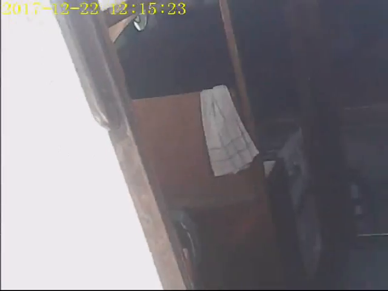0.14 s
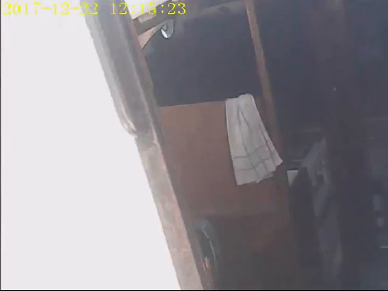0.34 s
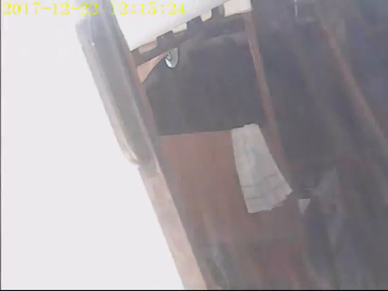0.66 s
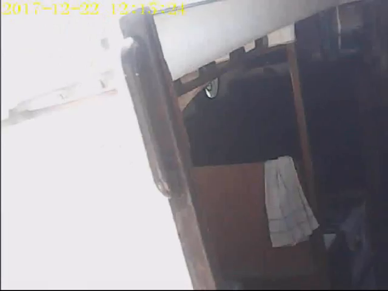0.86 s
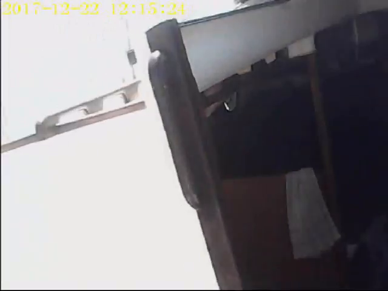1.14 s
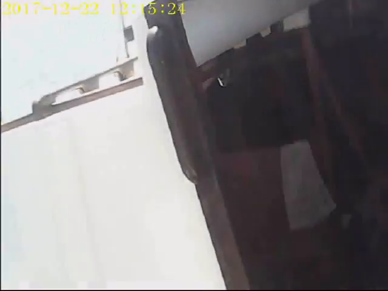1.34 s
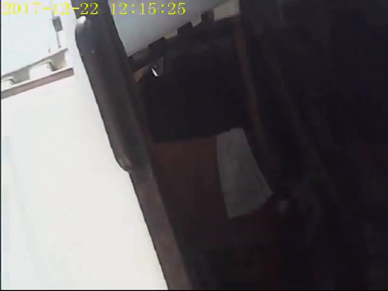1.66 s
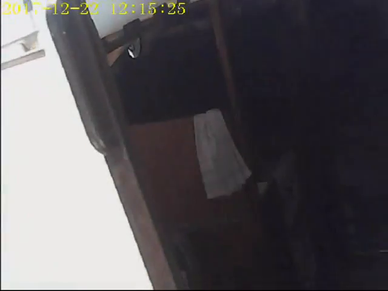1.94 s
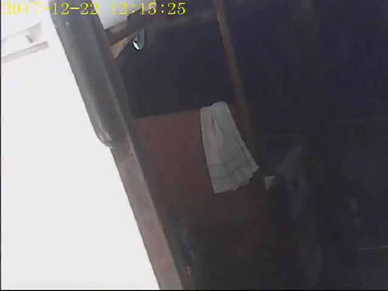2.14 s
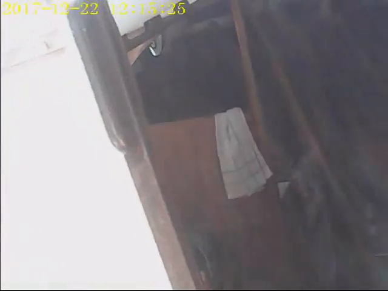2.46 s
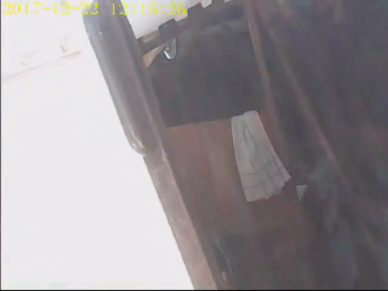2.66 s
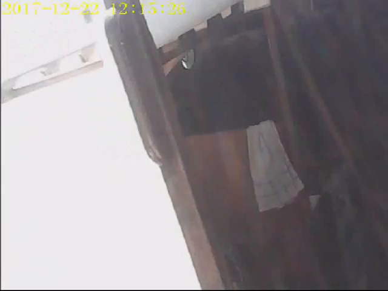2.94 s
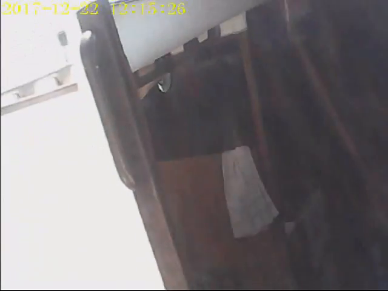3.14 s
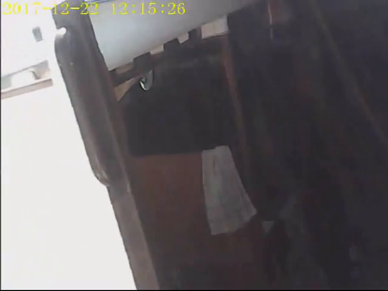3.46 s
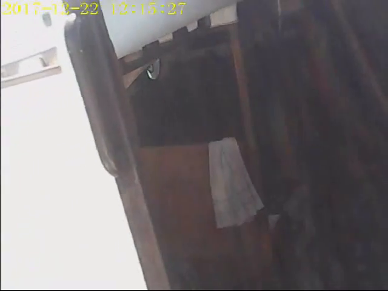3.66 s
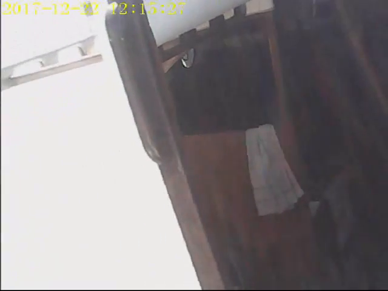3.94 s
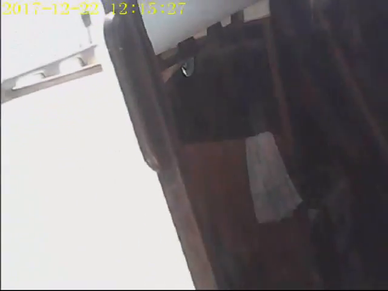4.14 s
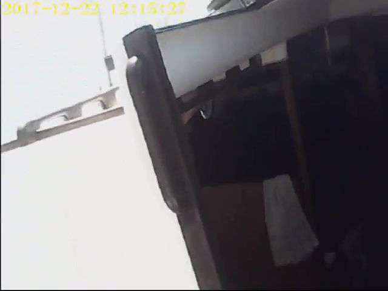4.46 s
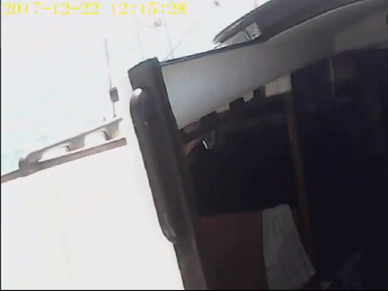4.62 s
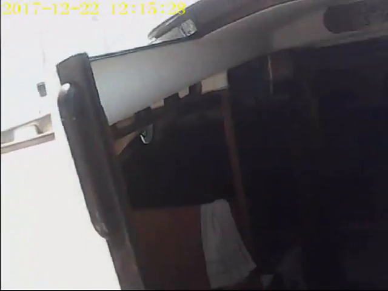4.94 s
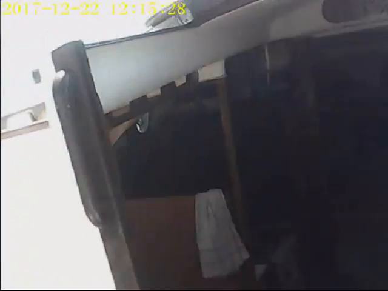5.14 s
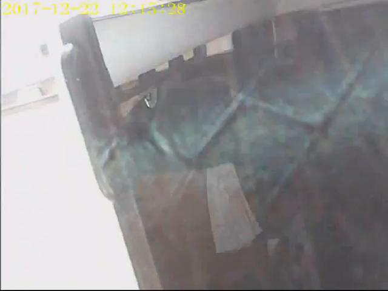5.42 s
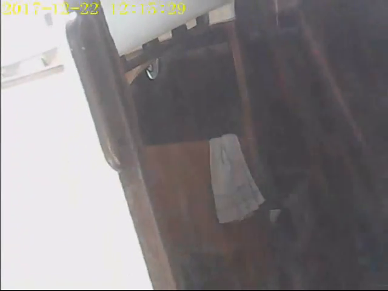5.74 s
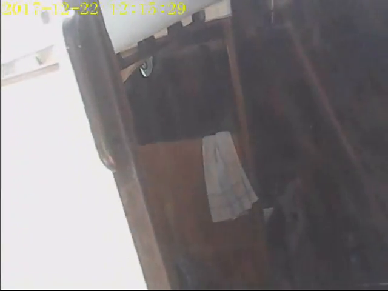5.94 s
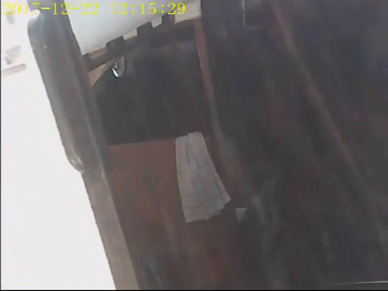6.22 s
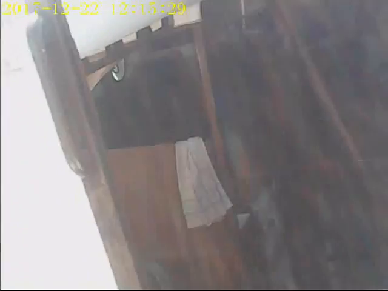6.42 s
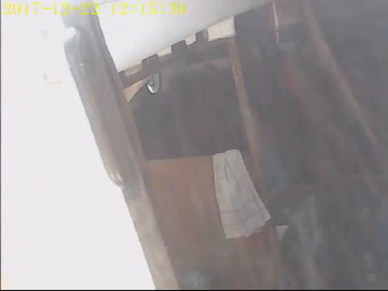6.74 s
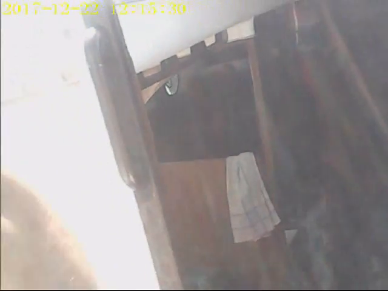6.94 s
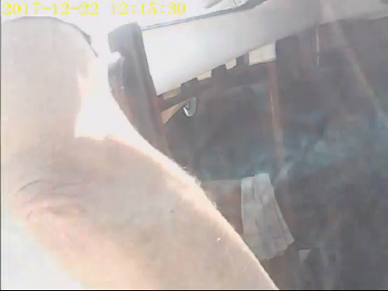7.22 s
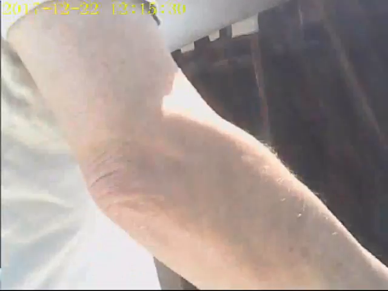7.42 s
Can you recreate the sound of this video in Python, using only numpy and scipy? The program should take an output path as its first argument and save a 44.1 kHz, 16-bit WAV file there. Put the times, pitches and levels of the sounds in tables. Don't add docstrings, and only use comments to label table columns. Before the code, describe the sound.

Aboard a sailing boat, a diesel engine throbs low and steady with a rapid ratchet-like metallic knock about thirteen times a second. Water washes and slaps quietly along the hull, and light wind puffs rumble. One small hard tick comes partway through. Near the end a gust batters the microphone with dull thumps and crackling bursts. The sound is close, cheap and gritty, with a hissy, harsh top.

```python
import sys
import numpy as np
from scipy import signal
from scipy.fft import rfft, irfft, next_fast_len
from scipy.io import wavfile
from scipy.ndimage import uniform_filter1d

SR = 44100
rng = np.random.default_rng(int(sys.argv[2]) if len(sys.argv) > 2 else 0)


def to_wav(sig):
    pcm = np.clip(np.atleast_2d(sig), -1, 1) * 32767
    pcm = np.round(pcm).astype(np.int16)
    wavfile.write(sys.argv[1], SR, pcm.T)


def field_ratio(decibels):
    return 10 ** (np.asarray(decibels, dtype=float) / 20)


N = 334278
TIME_S = np.arange(N) / SR


def evened(x):
    return x / np.sqrt(np.mean(x ** 2) + 1e-20)


def noise(count=N):
    return rng.standard_normal(count)


def filtered(x, order, hz, kind="low"):
    return signal.sosfilt(signal.butter(order, hz, kind, fs=SR, output="sos"), x)


def coloured(x, spectrum):
    size = next_fast_len(len(x))
    hz, db = np.transpose(spectrum)
    log_hz = np.log(np.fft.rfftfreq(size, 1 / SR) + 1)
    gain = field_ratio(np.interp(log_hz, np.log(hz), db))
    return irfft(rfft(x, size) * gain, size)[:len(x)]


def ring(x, modes):
    out = 0
    for hz, width_hz, db in modes:
        peak = signal.iirpeak(hz, hz / width_hz / 1.5, SR)
        out = out + field_ratio(db) * signal.lfilter(*peak, signal.lfilter(*peak, x))
    return out


def wander(hz):
    return evened(filtered(noise(), 2, hz))


# (time [s], firings so far [count])
CRANK = [(0, -.319), (1.2, 15.483), (2, 26.069), (2.8, 36.612), (4.2, 55.112), (6, 78.93), (7.6, 100.05)]
THROB_DB = [-46, -38.5, -41, -44.5, -44.5, -50, -46.5, -39.5, -46.5, -64, -57, -51, -54, -53.5, -57, -54,
            -45, -50.5, -56, -47.5, -60, -68, -60.5, -62, -57]
# (multiple [firing rate], level [dB rms])
WHINE = [(30, -66), (32, -56.5), (33, -53), (35, -68.5), (36, -54.5), (39, -62), (40, -69.5), (41, -60),
         (44, -58.5), (46, -60), (62, -67), (67, -60), (71, -60.5), (72, -62.5)]
SWELL_AT = [(3, .94), (4, 1.28), (5, .92), (8, 1.32), (9, 1.57), (12, 1.3), (20, 1.37), (72, 1.1)]


def throb():
    turns = np.interp(TIME_S, *np.transpose(CRANK))
    sway = wander(3.75)
    multiples = np.arange(73)
    late = np.cumsum(np.interp(multiples, *np.transpose(SWELL_AT)))
    loose = np.minimum(multiples / 40, 1) * rng.uniform(-.5, .5, 73)
    out = np.zeros(N)
    for k, db in list(enumerate(THROB_DB, 1)) + [(round(k), db) for k, db in WHINE]:
        level = field_ratio(db + 1.75 * np.roll(sway, 4000 * k)) * np.sqrt(2)
        out += level * np.cos(2 * np.pi * (k * turns - late[k] + loose[k]))
    return out


def beats(share, spread_db, jitter):
    s, firings = np.transpose(CRANK)
    luck = rng.standard_normal((104, 2))
    cycle = np.arange(-2, 102) + share + jitter * luck[:, 0]
    at = np.interp(cycle, firings, s, -1, 99) * SR
    inside = (at >= 0) & (at < N)
    clicks = np.zeros(N)
    clicks[at[inside].astype(int)] = field_ratio(spread_db * luck[inside, 1])
    return clicks


# (time [share of cycle], into cover [dB], into block [dB], rattle t60 [s])
BLOWS = [
    (.655, -2, -10, .07),
    (.915, -1, 0, .042),
    (.1, -3, -7, .085),
]
# (frequency [Hz], width [Hz], level [dB])
COVER = [(2100, 250, -7), (2378, 28, 3)]
# (frequency [Hz], width [Hz], level [dB])
BLOCK = [(2551, 210, 1), (2688, 80, -3), (2910, 400, -17), (3970, 420, -14), (3960, 150, -19),
         (6400, 92, -21.5)]
# (frequency [Hz], width [Hz], level [dB])
HULL = [(316, 14, 10), (448, 70, 13), (506, 41, 10), (596, 35, 4), (818.5, 55, 8), (954, 43, 6.5),
        (1308, 53, 0.5)]
# (frequency [Hz], level [dB])
CLATTER = [(150, 11), (300, 5), (500, 2.5), (950, 2.5), (1400, -8), (2500, -3), (3400, -15), (4500, -14.5),
           (5000, -34), (8000, -35)]
KNOCK_DB, CLATTER_DB, HULL_DB = -53, 9.0, -47.5


def knock():
    t = np.arange(SR // 5) / SR
    cover, block, envelope = np.zeros((3, N))
    for share, cover_db, block_db, t60_s in BLOWS:
        clicks = beats(share, spread_db=1.4, jitter=.008)
        decay = field_ratio(-60 * t / t60_s) * (1 - np.exp(-t / 0.0039))
        dying = signal.oaconvolve(clicks, decay)[:N]
        blow = dying * noise() + 7 * clicks
        cover += field_ratio(cover_db) * blow
        block += field_ratio(block_db) * blow
        envelope += field_ratio(block_db) * dying
    metal = evened(ring(cover, COVER) + ring(block, BLOCK))
    hull = evened(ring((envelope + 0.067) * noise(), HULL))
    rattle = (uniform_filter1d(envelope, 300) + 0.18) * noise()
    clatter = field_ratio(CLATTER_DB) * evened(coloured(rattle, CLATTER))
    return field_ratio(KNOCK_DB) * (metal + clatter) + field_ratio(HULL_DB) * hull


# (crest time [s], level [dB rms])
PUFFS = [(.57, -33.5), (1.15, -34.5), (1.42, -35.5), (1.72, -35), (2.02, -28), (2.41, -34), (2.98, -37),
         (3.53, -31), (3.85, -43), (4.48, -42), (4.79, -37), (5.33, -31.5), (5.84, -32.5)]
CALM_DB, BUILD_DB_PER_S, DROP_DB_PER_S, PUFF_RUSH_DB = -44, 69, 164, -14.5
# (start [s], hold [s], level [dB rms], rush above 280 Hz re level [dB])
BLASTS = [(6.22, 0.028, -25, -23), (6.32, 0.0068, -22, -14), (6.472, .02, -20.5, -9.5),
          (6.503, 0.053, -19.5, -17.5), (6.585, 0.03, -21, -10.5), (6.668, 0.082, -19, -9),
          (6.779, 0.049, -19, -7.5), (6.904, .08, -22, -10.5), (7.045, 0.041, -26, -5.5),
          (7.128, 0.096, -26, -13), (7.277, 0.036, -19.5, -11), (7.332, 0.096, -26.5, -7),
          (7.47, 0.16, -29.5, -9.5)]
ATTACK_DB_PER_S, RELEASE_DB_PER_S = 700, 308
# (frequency [Hz], level [dB])
WIND = [(8, 4), (30, 0), (150, -3), (400, -8), (700, -18), (1400, -28.5), (3000, -45), (8000, -85)]


def wind():
    pressure = np.full(N, field_ratio(CALM_DB))
    for s, db in PUFFS:
        fall_db = np.maximum(BUILD_DB_PER_S * (s - TIME_S), DROP_DB_PER_S * (TIME_S - s))
        pressure += field_ratio(db - fall_db)
    rushing = field_ratio(PUFF_RUSH_DB) * pressure
    for s, hold_s, db, rush_db in BLASTS:
        before_db = ATTACK_DB_PER_S * (s - TIME_S)
        after_db = RELEASE_DB_PER_S * (TIME_S - s - hold_s)
        blast = field_ratio(db - np.maximum(np.maximum(before_db, after_db), 0))
        pressure += blast
        rushing += field_ratio(rush_db) * blast
    air = coloured(noise(), WIND)
    low = evened(filtered(air, 3, 280))
    rush = evened(filtered(air, 2, 280, "high"))
    crackle = field_ratio(3 * wander(120))
    return pressure * field_ratio(1.03 * wander(42)) * low + rushing * crackle * rush


# (time [s], peak level [dB], length [ms])
POPS = [(1.977, -24, 6), (1.995, -30, 8), (6.228, -29.5, 12), (6.303, -32, 5), (6.467, -8, 4.7),
        (6.492, -19, 8.9), (6.518, -27, 8), (6.579, -25, 12), (6.599, -10, 4.4), (6.659, -35, 6.8),
        (6.685, -16.5, 6.4), (6.711, -22, 8.8), (6.744, -21, 8), (6.945, -22, 9.8), (6.978, -14, 35),
        (7.054, -12, 25), (7.08, -16, 6.5), (7.18, -21, 14), (7.238, -19.5, 8), (7.27, -13.5, 6.7),
        (7.303, -15.5, 16), (7.342, -15, 8.9), (7.397, -16, 18), (7.479, -21, 7), (7.558, -24.5, 5.8)]
# (frequency [Hz], level [dB])
POP = [(200, 17), (500, 2), (1000, 0.5), (1800, -8.5), (3000, -18.5), (5000, -52), (8000, -55)]


def pops():
    out = np.zeros(N + SR)
    t = np.arange(SR // 10) / SR
    for s, db, ms in POPS:
        envelope = np.exp(-t * 1000 / max(ms, 1)) * (1 - np.exp(-t / 0.00091))
        flutter = coloured(noise(len(t)), POP) * envelope
        out[round(s * SR):][:len(t)] += field_ratio(db) * flutter / abs(flutter).max()
    return out[:N]


# (crest time [s], peak level [dB], length [ms], direction [sign])
THUMPS = [(2.034, -17, 1.2, 1), (6.232, -18, 3, 1), (6.328, -11, 1.6, 1), (6.504, -13, 1.4, 1),
          (6.511, -9, 3, -1), (6.552, -7, 2, 1), (6.69, -13, 1.2, 1), (6.748, -13, 1, 1),
          (6.774, -9, 1.4, -1), (6.799, -8, 1.6, -1), (6.918, -13, 1, 1), (6.949, -13, 1, 1),
          (6.98, -12, 1.4, -1), (7.283, -8, 2, 1), (7.345, -11, .8, 1), (7.486, -15, 3, 1)]


def thumps():
    out = np.zeros(N)
    for s, db, ms, direction in THUMPS:
        u = np.arange(-800, 800) / SR * 1000 / ms
        crest = (1 - 0.37 * u ** 2) * np.exp(-u ** 2 / 2)
        out[round(s * SR) - 800:][:1600] += np.sign(direction) * field_ratio(db) * crest
    return out


# (time [s], peak level [dB])
TICKS = [
    (2.2394, -46),
    (3.1005, -28.5),
    (5.572, -42),
    (5.713, -39),
    (5.95, -42),
    (6.22, -40),
    (6.302, -40),
]
# (frequency [Hz], width [Hz], level [dB])
FITTING = [(1050, 150, 7), (1450, 150, 7), (2600, 900, -3), (4050, 400, 3), (4900, 400, 1), (5600, 350, 2)]


def ticks():
    out = np.zeros(N)
    t = np.arange(SR // 20) / SR
    for s, db in TICKS:
        strike = field_ratio(-60 * t / .036) * noise(len(t)) + 10 * (t == 0)
        tick = ring(strike, FITTING)
        out[round(s * SR):][:len(t)] += field_ratio(db) * tick / abs(tick).max()
    return out


def swells(rows, spectrum):
    shape = sum(field_ratio(db) * np.exp(-((TIME_S - s) / length_s) ** 2) for s, db, length_s in rows)
    return shape * field_ratio(4.1 * wander(87)) * evened(coloured(noise(), spectrum))


# (crest time [s], level [dB rms], length [s])
SLAPS = [(.55, -49.5, 0.06), (1.2, -49, 0.055), (1.4, -53.5, 0.058), (1.93, -51, 0.045), (2.25, -50, 0.037),
         (2.8, -49.5, 0.083), (3.52, -52, 0.034), (4.05, -52, 0.092), (4.3, -66, .04), (4.55, -50.5, 0.085),
         (5.72, -41.5, 0.012), (5.85, -54, 0.027), (6.24, -46.5, .06)]
# (frequency [Hz], level [dB])
SLAP = [(200, -38), (500, 7), (1000, 7.5), (1600, -3), (2500, -4), (4000, -10), (6000, -47)]


def slaps():
    return swells(SLAPS, SLAP)


# (crest time [s], level [dB rms], length [s])
SCRAPE = (7.556, -40, 0.02)
# (frequency [Hz], level [dB])
SLEEVE = [(800, -24), (1500, -7), (2300, 0), (3000, -7), (5000, -24)]


def scrape():
    return swells([SCRAPE], SLEEVE)


# (frequency [Hz], level [dB])
WASH = [(40, 7.5), (150, -6.5), (300, -5.5), (500, -10), (900, -17), (1500, -19), (2600, -25.5),
        (3600, -29.5), (5000, -39), (8000, -43)]
WASH_DB = -41


def wash():
    return field_ratio(WASH_DB + 2.5 * wander(1.8)) * evened(coloured(noise(), WASH))


def scene():
    engine = throb() + knock()
    air = wind() + pops() + thumps()
    water = slaps() + wash()
    return (engine + air + ticks() + scrape() + water)[None]


def top_cut(x):
    return signal.sosfilt(signal.butter(12, 15800, fs=SR, output="sos"), x)


def record(dry):
    hiss_db, offset = -62.0, -.0375
    slow = signal.resample_poly(dry, 160, 441, axis=1)
    slow = 0.79 * np.tanh(slow / 0.8) + field_ratio(hiss_db) * noise(slow.shape)
    held = slow[:, np.arange(N) * 160 // 441]
    edge = signal.firwin(511, 15790, window=("kaiser", 9), fs=SR)
    mix = signal.oaconvolve(held, edge[None], "same") + offset
    return top_cut(mix)


dry = scene()
out = record(dry)
to_wav(out)
```